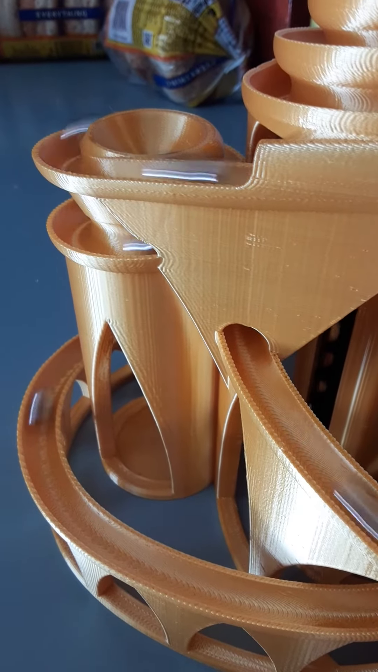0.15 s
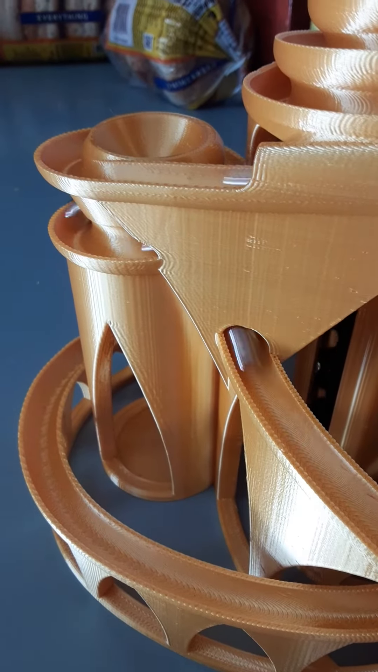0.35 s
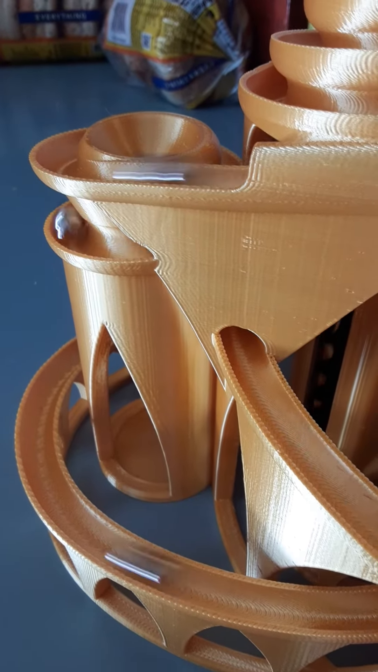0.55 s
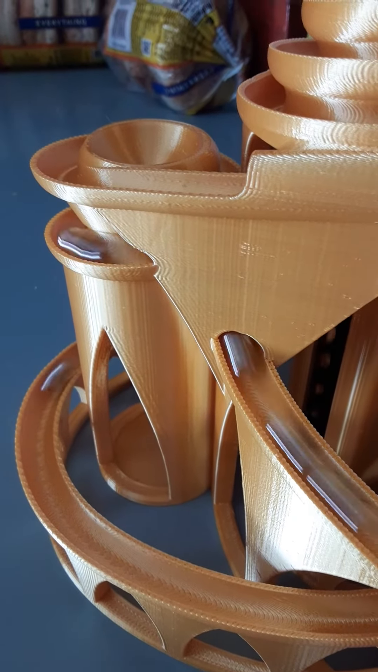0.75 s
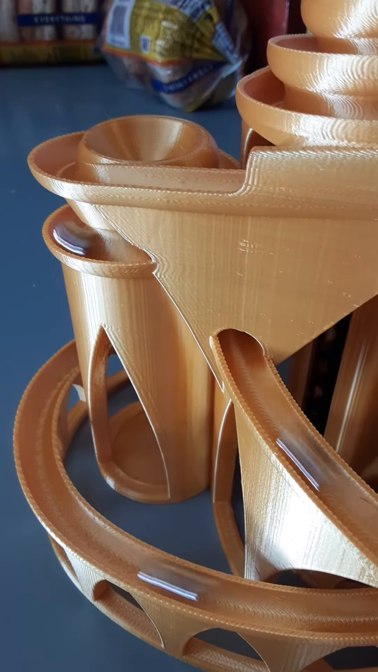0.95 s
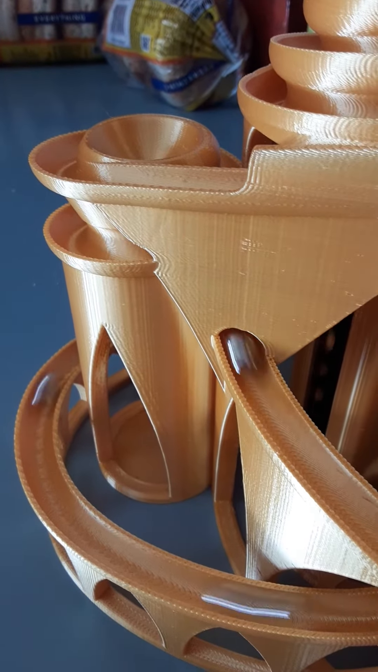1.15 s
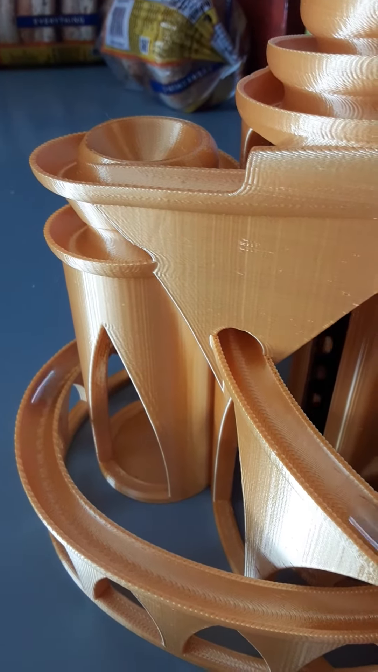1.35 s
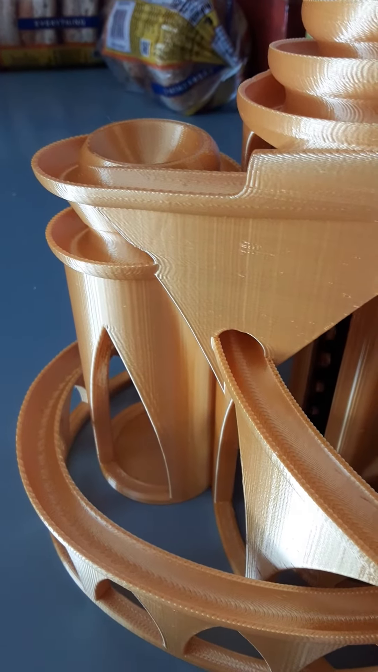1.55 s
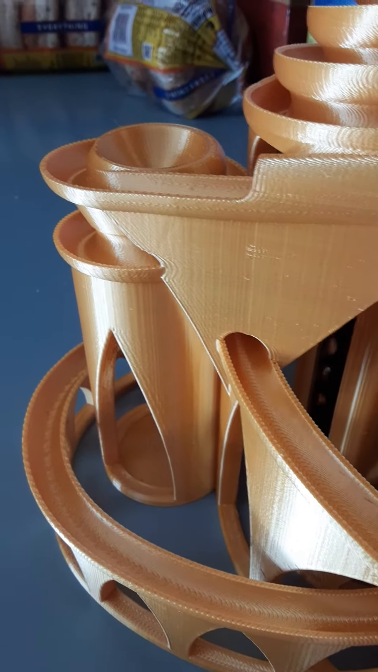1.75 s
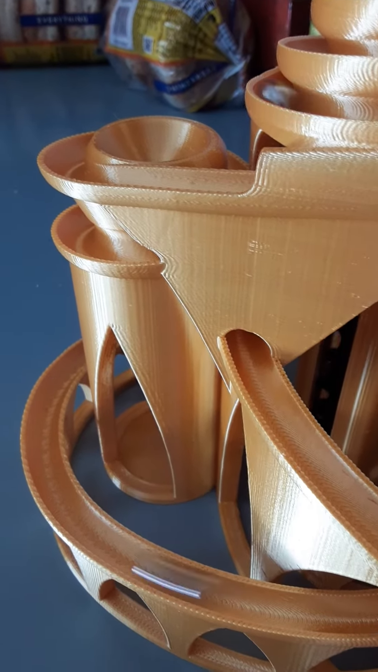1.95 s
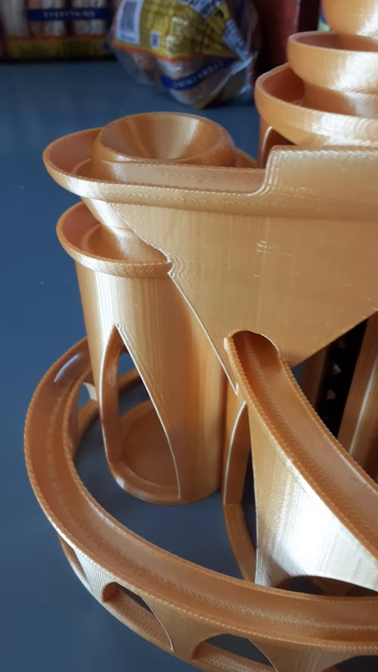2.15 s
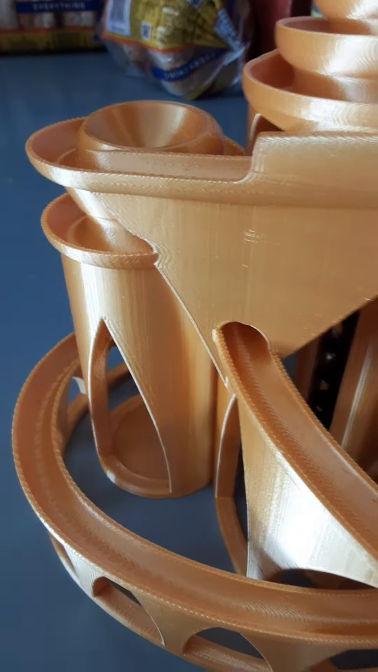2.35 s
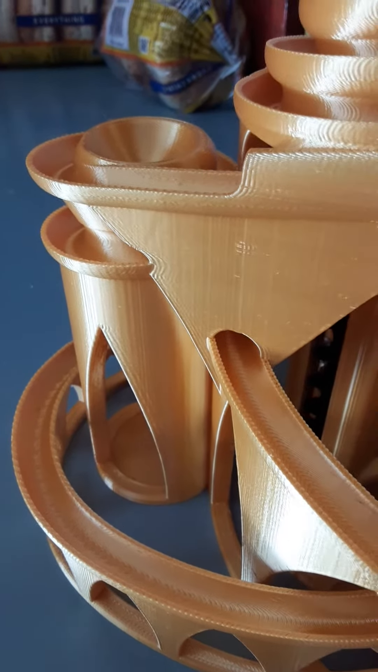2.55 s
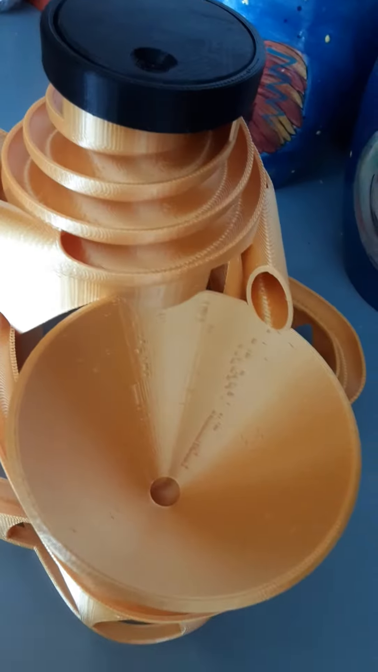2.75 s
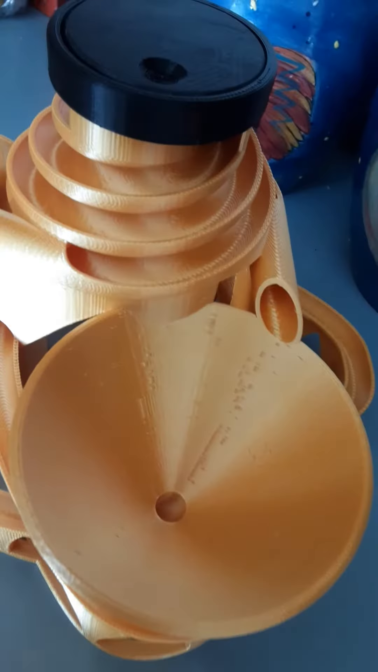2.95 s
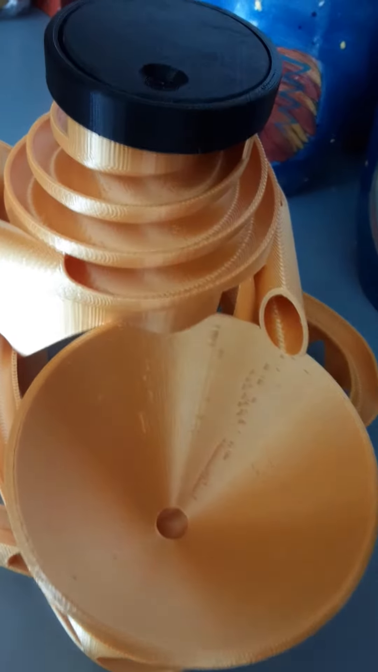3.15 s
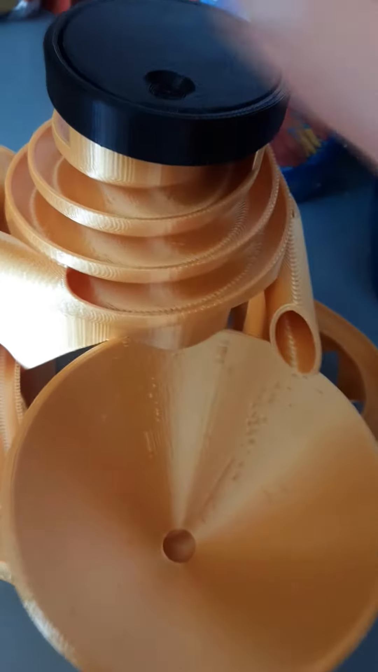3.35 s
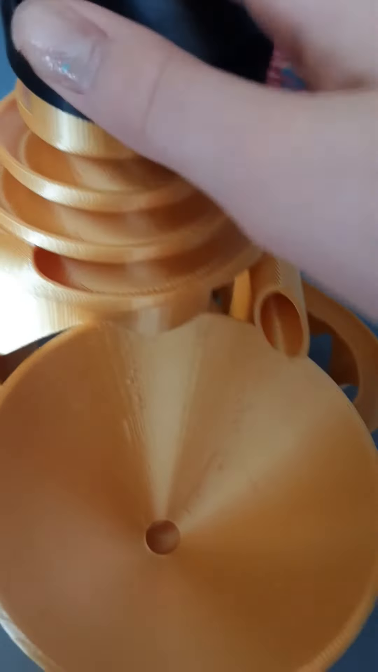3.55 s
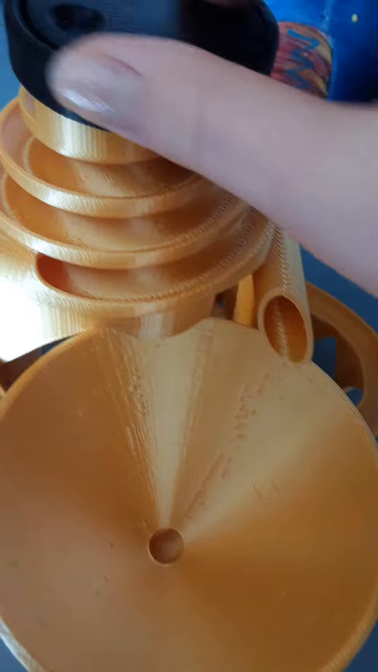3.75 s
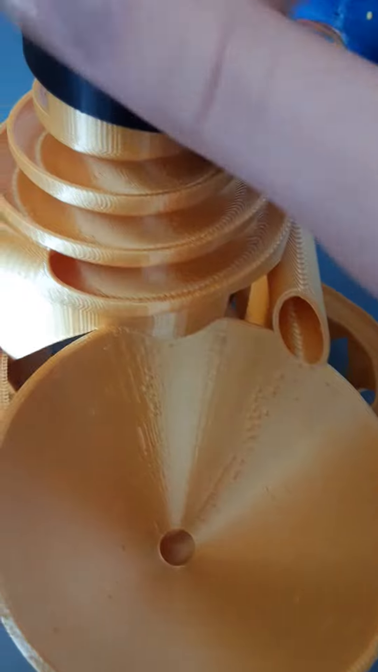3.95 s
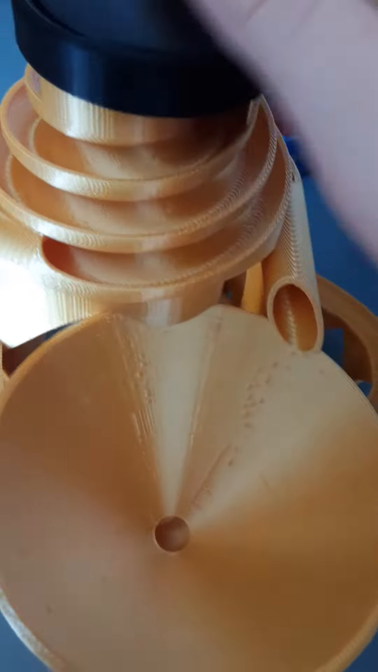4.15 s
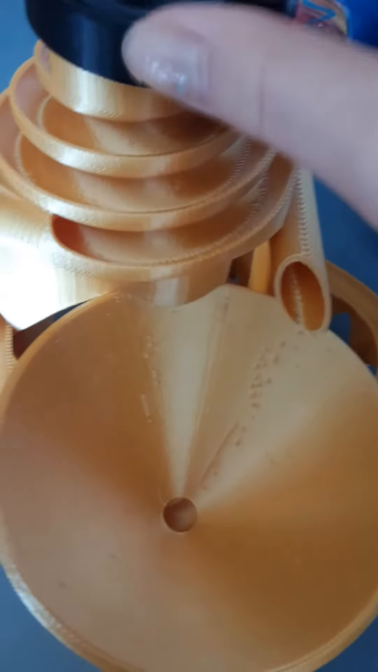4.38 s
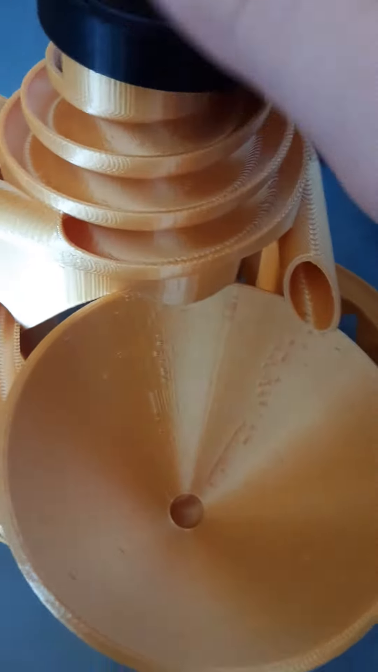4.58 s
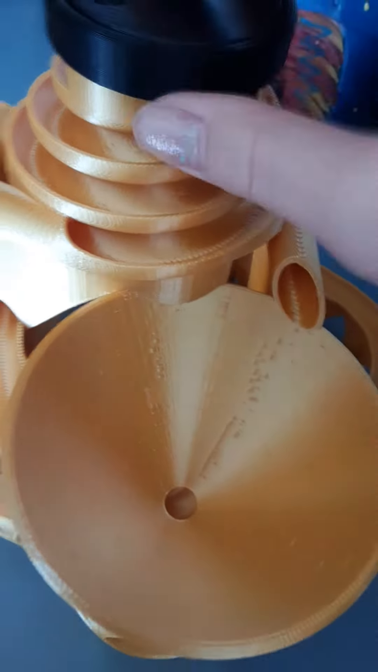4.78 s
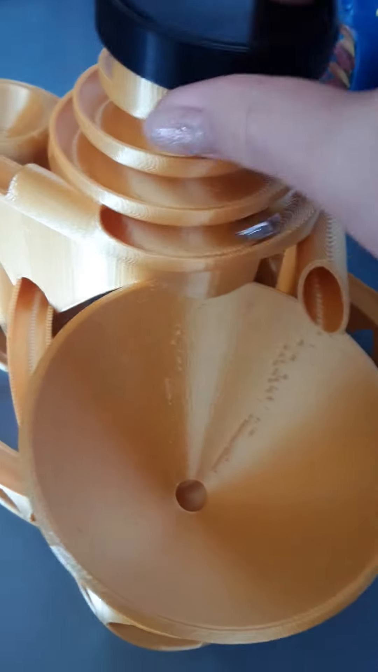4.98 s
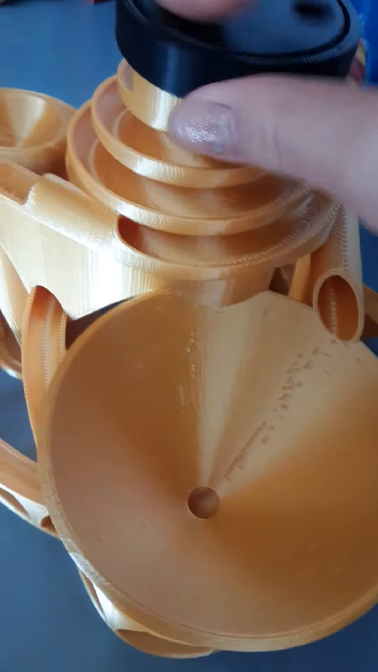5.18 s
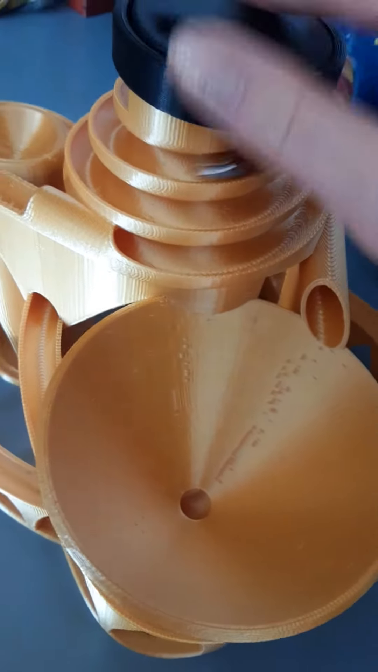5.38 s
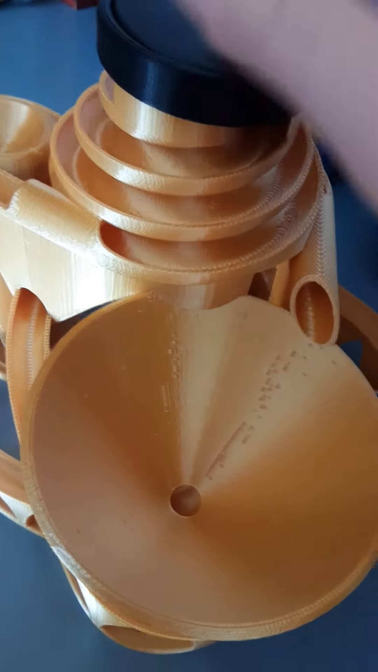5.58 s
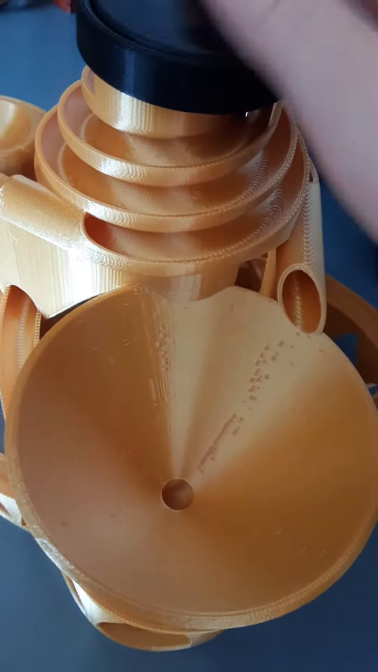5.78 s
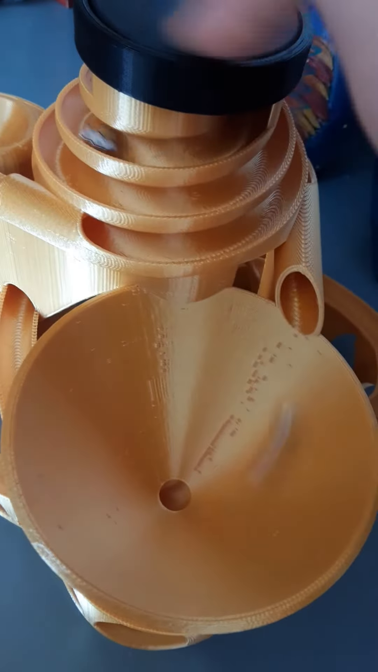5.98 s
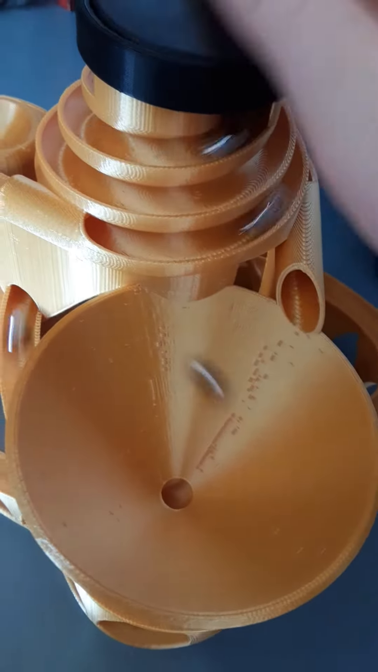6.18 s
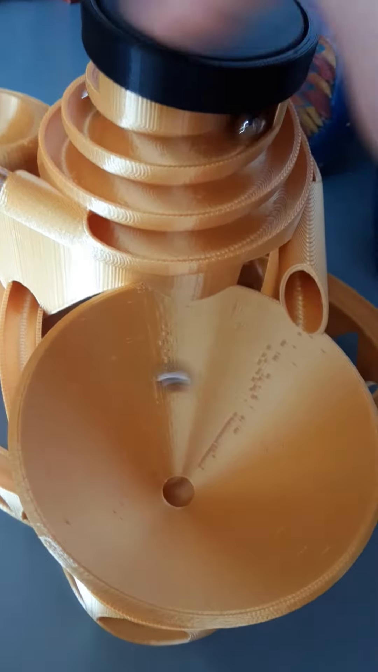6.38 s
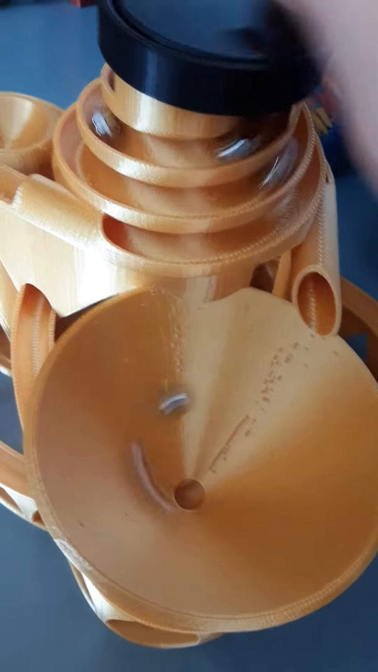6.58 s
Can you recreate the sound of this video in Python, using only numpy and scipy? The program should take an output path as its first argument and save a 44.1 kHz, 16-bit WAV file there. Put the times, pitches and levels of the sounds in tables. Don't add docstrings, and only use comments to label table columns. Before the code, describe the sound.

Dense clattering of metal balls in a plastic marble run stops abruptly; after a hush, three creaky jerks and knocks restart a thinner rolling rattle.

```python
import sys
import numpy as np
from scipy import signal
from scipy.fft import rfft, irfft
from scipy.io import wavfile
from scipy.ndimage import uniform_filter1d

SR = 44100
rng = np.random.default_rng(int(sys.argv[2]) if len(sys.argv) > 2 else 0)


def voltage_ratio(level):
    return 10 ** (np.asarray(level, float) / 20)


def master(y):
    cut = np.clip(np.atleast_2d(y).T, -1, 1)
    pcm = np.round(cut * 32767)
    wavfile.write(sys.argv[1], SR, pcm.astype(np.int16))


N = 291942

CHANGE_S = 2.734
REST_S = (4.58, 4.94)
TOP_HZ = 15900


# low edge in Hz, high edge in Hz.
EDGES_HZ = [
    (400, 4000),
    (4000, 8500),
    (8500, 15700),
    (45, 400),
]
WALLS_HZ = [
    [1350, 1896, 2070, 2550, 2980, 3350],
    [770, 1080, 1360, 1900, 2380, 3700],
    [1280, 1900, 2850],
    [990, 1330, 1606, 1910, 2400, 2524, 3150],
]


def rolling():
    force = ridges(spread_db=2.2, smear_s=0.0006, steady=0.7)
    rattle, treble, air, drone = [shell(force, *edge) for edge in EDGES_HZ]

    place = np.searchsorted([CHANGE_S, *REST_S], np.arange(N) / SR)
    walls = [ticks(hz, rate=700, spread_db=2.2, decay=420, tilt=0.3) for hz in WALLS_HZ]
    ribs = ticks(np.geomspace(4300, 7800, num=7), rate=600, spread_db=1.5, decay=490)
    rattle = 0.75 * rattle + voltage_ratio(-5.0) * np.choose(place, walls)
    treble = 0.75 * treble + voltage_ratio(-7.5) * ribs

    sharp, shiver_gain, flutter = clinks(), shiver(), walk(40)
    rattle = rattle * roll_gain("rattle") * voltage_ratio(0.7 * flutter)
    treble = treble * sharp * roll_gain("treble") * voltage_ratio(1.2 * flutter + walk(70))
    air = air * sharp * roll_gain("air") * voltage_ratio(1.5 * flutter + walk(60))
    drone = drone * roll_gain("drone") * voltage_ratio(2.5 * walk(12))
    return (rattle + treble + air) * shiver_gain + drone


def ridges(spread_db, smear_s, steady):
    bumps = voltage_ratio(spread_db * rng.exponential(size=N)) * (rng.random(N) < 1100 / SR)
    keep = np.exp(-1 / (smear_s * SR))
    swell = signal.lfilter([1], [1, -keep], bumps)
    return level(rng.standard_normal(N) * (swell + steady))


# frequency in Hz, density in dB per Hz.
SIDE_A = [(24, -58), (40, -23.5), (167, -3.5), (262, -13), (312, -4.5), (372, -12), (615, -6.5),
          (852, -8.5), (1340, -1), (2050, -4), (2260, -3), (7540, -16), (8550, -22), (12100, -15.5),
          (16000, -25.5)]
SIDE_B = [(24, -56), (40, -27), (101, -17), (159, -3.5), (209, -4), (262, -20), (312, -7), (529, -9.5),
          (990, -7.5), (1900, -3.5), (4460, -16.5), (7170, -18), (8550, -30.5), (11600, -28.5),
          (16000, -35.5)]
# centre in Hz, width in Hz, boost in dB.
RINGS_A = [(180, 110, 5.5), (312, 50, 7.5), (459, 84, 4.5), (610, 120, 4), (754, 90, 3), (1350, 100, 2),
           (2070, 41, 7), (3050, 250, 3.5), (7470, 500, 5), (12100, 900, -2)]
RINGS_B = [(177, 250, 1.1), (773, 16, 7.2), (1022, 53, 3), (1360, 70, 4.3), (1910, 34, 2.9),
           (2410, 71, 5.5), (2790, 300, 1.5), (6000, 700, 2.5), (7400, 400, 2), (11900, 1500, 4)]


def shell(force, lo_hz, hi_hz):
    parts = np.split(force[:N], [int(CHANGE_S * SR)])
    out = []
    for part, colour, rings in zip(parts, (SIDE_A, SIDE_B), (RINGS_A, RINGS_B)):
        answer = band(response(colour, rings), lo_hz, hi_hz)
        answer /= np.linalg.norm(answer)
        out.append(signal.oaconvolve(part, answer)[:len(part)])
    return np.concatenate(out)


def ticks(walls_hz, rate, spread_db, decay, tilt=0.0):
    size = voltage_ratio(spread_db * np.minimum(rng.exponential(size=N), 3.5))
    hits = size * rng.choice([-1, 1], N) * (rng.random(N) < rate / SR)
    wall = rng.integers(len(walls_hz), size=N)
    out = np.zeros(N)
    for k, hz in enumerate(walls_hz):
        awake = voltage_ratio(2.8 * walk(9))
        out += hz ** -tilt * ringing(hits * (wall == k) * awake, hz, decay)
    return level(band(out, 560, 9000))


def shiver():
    t = np.arange(N) / SR
    rate_hz = 88 * (1 + 0.1 * walk(60))
    phase = np.cumsum(rate_hz / SR) % 1
    return voltage_ratio(14 * (0.4 - phase) * (t > REST_S[0]) * (t < REST_S[1]))


def clinks():
    rate, decay_s = 55, 0.002
    hits = 0.35 * np.minimum(rng.exponential(size=N), 2) * (rng.random(N) < rate / SR)
    return 0.88 + signal.lfilter([1], [1, -np.exp(-1 / (decay_s * SR))], hits)


# time in seconds, traffic in dB, steel-on-steel clink in dB against it.
TRAFFIC = [
    [(0.0, -20.5, -12), (0.11, -25.5, -16), (0.22, -24.5, -9.5), (0.4, -23, -15), (0.55, -25.5, -14),
     (0.66, -23, -15.5), (0.85, -24.5, -16), (1.05, -23, -18), (1.43, -24.5, -20.5), (1.65, -24.5, -19.5),
     (1.76, -22, -14), (1.87, -25, -12), (2.09, -31, -19.5), (2.2, -26, -13.5), (2.31, -32, -11),
     (2.55, -32.5, -21), (2.74, -32.5, -20.5)],
    [(3.56, -70, -10), (3.572, -40, -16), (3.6, -57, -22), (3.71, -62, -14)],
    [(4.23, -35, -12), (4.262, -30.5, -8), (4.29, -40.5, -18), (4.33, -37, -24), (4.36, -50, -22)],
    [(4.5, -46, -7), (4.64, -46.5, -27), (4.85, -41.5, -25), (4.94, -39, -13), (4.96, -26, -23),
     (5.04, -29, -21), (5.09, -23.5, -24), (5.17, -28.5, -22.5), (5.39, -28.5, -21), (5.5, -30, -22.5),
     (5.63, -30, -22.5), (5.83, -26.5, -18.5), (5.94, -29, -23), (6.05, -26, -15.5), (6.27, -26, -20.5),
     (6.38, -24.5, -16), (6.49, -26, -19.5), (6.62, -20.5, -16)],
]
# start in seconds, drag in dB, catch in seconds, strain in dB,
# clink after the catch in dB.
STROKES = [
    (3.694, -40, 3.98, -26.5, -8),
    (4.09, -32, 4.2, -28, -11),
    (4.319, -34.5, 4.47, -30, -15.5),
]
# treble in dB, its change per traffic dB, its change per clink dB,
# table drone in dB, its change per traffic dB.
LAWS = [
    (-7.5, 0.54, 0.5, -18.5, 0.27),
    (-5.5, 0.15, 0.19, -15.5, -0.2),
]
# start in seconds, end in seconds, treble in dB, drone in dB.
SPELLS = [
    (2.138, 2.28, -8, 2),
    (2.3, 2.4, -1, 13.5),
    (4.04, 4.08, -5, 2),
    (4.124, 4.2, 0.5, -2),
    (4.584, 4.916, 4, 0.5),
    (4.802, 5.126, -1.5, 4),
    (5.9, 6.102, 0.5, 2.5),
    (6.43, 6.545, -0.5, -8),
]


def roll_gain(part):
    t = np.arange(N) / SR
    treble_spell, drone_spell = np.zeros((2, N))
    for start, end, treble_db, drone_db in SPELLS:
        inside = np.clip(np.minimum(t - start, end - t) / 0.03 + 0.5, 0, 1)
        treble_spell += treble_db * inside
        drone_spell += drone_db * inside

    power = np.zeros(N)
    for rows in TRAFFIC + [stroke(*row) for row in STROKES]:
        s, traffic_db, clink_db = np.transpose(rows)
        treble_db, per_db, per_clink, drone_db, drone_per_db = LAWS[int(s[0] > CHANGE_S)]
        span = slice(int(s[0] * SR), int(s[-1] * SR) + 1)
        db = np.interp(t[span], s, traffic_db)
        clink = np.interp(t[span], s, clink_db)
        busy, hard = db + 25, clink + 18
        if part == "treble":
            db = db + treble_db + per_db * busy + per_clink * hard + treble_spell[span]
        elif part == "air":
            db = db + clink
        elif part == "drone":
            db = db + drone_db + drone_per_db * busy + drone_spell[span]
        power[span] += voltage_ratio(db) ** 2
    return np.sqrt(power + 1e-12)


def stroke(start, drag_db, catch, strain_db, clink_db):
    bite_s, recoil_s, release_s = 0.03, 0.045, 0.058
    slack_db, recoil_db, release_db, dull_db = -12.5, -2, -14, -23.5
    recoil = catch + recoil_s
    free = recoil + release_s
    return [(start - bite_s, drag_db + 3 * slack_db, dull_db),
            (start, drag_db + slack_db, dull_db),
            (start + bite_s, drag_db, dull_db),
            ((start + catch) / 2 + bite_s, 0.75 * drag_db + 0.24 * strain_db, dull_db),
            (catch, strain_db, clink_db - 3.0),
            (recoil, strain_db + recoil_db, clink_db),
            (free, strain_db + release_db, dull_db),
            (free + release_s, strain_db + 3 * release_db, dull_db)]


# time in seconds, low rib in Hz, high rib in Hz, level in dB.
RIBS = [
    (1.649, 3290, 5980, 4),
    (2.303, 2030, 3210, 3),
    (2.326, 3200, 4700, 0),
    (3.992, 1350, 4660, -1),
    (4.212, 2340, 3860, 3),
    (4.474, 4220, 5400, 6),
    (6.317, 6450, 7140, -2),
]
# frequency in Hz, level in dB, decay per second.
TUBE = [
    (1280, -28.5, 200),
    (1900, -28, 160),
    (2850, -26, 125),
]


def knocks():
    size = 4096
    force, crack, ring = np.zeros((3, N + size))
    t = np.arange(size) / SR
    for s, body_db, ring_hz, crack_db, rise_ms, fall_ms in blows():
        rise, fall = max(0.59 * rise_ms, 0.15) / 1000, max(fall_ms, 0.8) / 1000
        chatter = rng.standard_normal((2, size)) * np.minimum(t / rise, 1)
        after = np.maximum(t - rise, 0)
        chatter *= 1 + 1.6 * np.exp(-(after + rise) / 0.00034)
        shake = voltage_ratio(body_db) * chatter[0] * np.exp(-after / (1.2 * fall))
        snap = voltage_ratio(crack_db) * chatter[1] * np.exp(-after / (0.88 * fall))

        low_hz, high_hz, rib_db = rng.uniform(3000, 4800), rng.uniform(5500, 7200), -3
        for at, *rib in RIBS:
            if abs(at - s) < 0.003:
                low_hz, high_hz, rib_db = rib
        span = slice(int(s * SR), int(s * SR) + size)
        force[span] += shake
        crack[span] += snap
        ring[span] += voltage_ratio(-21) * ringing(shake, ring_hz, 330)
        ring[span] += voltage_ratio(rib_db - 22) * ringing(snap, low_hz, 400)
        ring[span] += voltage_ratio(rib_db - 21) * ringing(snap, high_hz, 550)

    force, crack, ring = force[:N], crack[:N], ring[:N]
    now = np.arange(N) / SR
    taps = force * (now > REST_S[0]) * (now < REST_S[1])
    tube = sum(voltage_ratio(db) * ringing(taps, hz, decay) for hz, db, decay in TUBE)
    hard = 2.68 * signal.lfilter([1, -0.75], [1], force)
    air = roll_gain("air") / roll_gain("treble")
    body = voltage_ratio(-2.0) * shell(hard, 320, 5300) + band(ring + tube, 800, 7400)
    bright = voltage_ratio(-2.0) * shell(crack, 3600, 8500)
    return body + bright + voltage_ratio(3.0) * air * shell(crack, *EDGES_HZ[2])


# time in seconds, body in dB, loudest ring in Hz, crack in dB.
TICKS = [(.0376, -13.5, 3140, -19), (.128, -28, 1990, -16), (.1883, -17, 1790, -20),
         (.9386, -21, 1220, -18.5), (2.1179, -22, 2020, -29), (2.7067, -29, 1960, -28),
         (2.6133, -25, 1960, -38), (2.6937, -25.5, 2740, -41), (2.724, -29.5, 2020, -36),
         (4.2217, -19.5, 2335, -37.5), (5.482, -20, 1900, -20), (5.514, -27, 4530, -27),
         (2.4703, -34, 1970, -32), (5.5436, -39, 1350, -23), (5.5865, -40, 1650, -24),
         (6.0634, -34, 2050, -21), (6.2966, -15.5, 1900, -19), (6.3168, -29, 1400, -16),
         (6.4151, -19.5, 1940, -19), (6.5402, -16, 1350, -15.5)]
DROPS = [(.1152, -20, 2070, -19.5), (.1683, -13, 2090, -26), (.5724, -21, 2050, -22),
         (.6493, -16, 1990, -17), (1.0476, -32, 2030, -29), (1.242, -28, 1370, -31),
         (1.484, -17, 3460, -22.5), (1.6482, -13, 4480, -10.5), (1.7063, -16.5, 1200, -26),
         (1.9042, -18.5, 1930, -18), (1.982, -29, 2730, -33), (2.0012, -40, 1360, -27.5),
         (2.091, -28, 2000, -28), (2.2519, -25, 2160, -32), (2.303, -11.5, 1530, -21),
         (6.036, -15.5, 2030, -18), (6.3916, -18.5, 2790, -30), (6.5066, -22.5, 1650, -26),
         (6.5295, -25, 2380, -28), (6.5685, -15, 1940, -14.5)]
TAPS = [(4.6441, -46, 1910, -45), (4.6187, -43, 1280, -54), (4.683, -35, 2505, -34),
        (4.6955, -33, 2840, -29), (4.707, -46, 6130, -28), (4.7173, -40, 2540, -41),
        (4.7462, -45, 1960, -40), (4.7723, -48, 1940, -46), (4.7902, -42, 1900, -47),
        (4.8043, -44, 1860, -25), (4.8133, -30.5, 1910, -29), (4.8286, -42, 4300, -27),
        (4.841, -32, 1300, -46), (4.8477, -32, 5070, -29), (4.8579, -27, 2680, -37),
        (4.872, -37, 2760, -34.5), (4.882, -38, 2830, -42)]
# the same four, then fall in ms.
CLATTERS = [(0.862, -17, 2160, -28, 12), (1.0372, -15, 2130, -14, 10), (1.1295, -23, 3030, -26, 6.5),
            (1.1598, -21, 3500, -23.5, 8.6), (1.326, -14, 1395, -21.5, 21), (1.3579, -15, 2070, -19.5, 8.9),
            (1.465, -16, 2980, -20.5, 8), (1.493, -17, 1320, -24.5, 8.8), (1.6711, -26, 3300, -17, 7),
            (1.7741, -18.5, 2000, -32, 13), (2.1493, -22.5, 1940, -25, 24), (2.2306, -23, 2070, -35, 17),
            (2.3259, -11.5, 2230, -20.5, 12), (2.374, -18, 2070, -32, 19),
            (3.9641, -18.5, 1167, -23.5, 13.7), (4.0018, -17, 1810, -34, 8.4),
            (4.4054, -26.5, 1360, -37, 11), (4.185, -30, 1900, -35, 14), (5.4333, -28, 1250, -28, 85),
            (5.613, -29.5, 1630, -26.5, 11), (5.773, -27, 1350, -29, 18), (6.364, -22, 1950, -24, 9.3)]
# the same four, then rise in ms.
SKIDS = [(.0082, -21.5, 2980, -24, 5), (0.2294, -17, 1340, -21, 5.7), (0.241, -18, 1820, -26, 4.6),
         (1.7428, -18, 3480, -13, 4.5), (1.8403, -16, 3410, -15.5, 9.3), (2.513, -31.5, 1966, -38.5, 5.3),
         (3.562, -40, 1360, -58, 7.9), (3.7689, -36, 2030, -41, 6), (3.9919, -15, 3800, -15, 5.4),
         (4.2114, -12, 1475, -13.5, 3.36), (4.474, -11, 1350, -16.5, 3), (4.953, -28.5, 1910, -41, 5.2),
         (4.9819, -23.5, 1660, -27, 11), (5.0654, -21, 1510, -24.5, 11.3)]


def blows():
    rows = [(*row, 1, 2.6) for row in TICKS]
    rows += [(*row, 0.94, 5.8) for row in DROPS]
    rows += [(*row, 0.6, 2.2) for row in TAPS]
    rows += [(*row, 1.9, fall_ms) for *row, fall_ms in CLATTERS]
    return rows + [(*row, rise_ms, 1.59 * rise_ms) for *row, rise_ms in SKIDS]


# time in seconds, level in dB, ring in Hz.
RAPS = [(0.093, -19.0, 2110.0), (0.1281, -18.0, 2650.0), (0.22, -15, 3180), (0.2934, -21, 1340.0),
        (0.3493, -17.0, 1460.0), (0.381, -20, 1930.0), (0.4422, -16.5, 1330), (0.458, -15, 2800),
        (0.7168, -18, 3160), (0.7819, -16, 1320.0), (0.853, -19, 2050.0), (0.9075, -19.0, 1400),
        (0.9988, -19, 1390.0), (1.5348, -20.0, 1970.0), (1.574, -22.0, 1510.0), (1.65, -8.0, 3360),
        (2.1196, -18.0, 2790.0), (2.1434, -20, 1780.0), (2.2023, -18.0, 2010.0), (2.412, -21.0, 2000.0),
        (2.492, -24.5, 1330), (2.6246, -27, 1360.0), (2.7078, -24.0, 1260.0), (3.773, -31.0, 1110.0),
        (4.251, -19.5, 1510.0), (4.2712, -34, 1870.0), (4.3295, -33.0, 2340.0), (4.5138, -24.0, 1550.0),
        (4.79, -36, 1190), (4.909, -33, 1720.0), (5.2614, -24, 2270.0), (5.4206, -25, 1320.0),
        (5.4786, -22, 1880.0), (5.68, -27, 1940.0), (5.7616, -24, 1480.0), (5.962, -22, 1890.0),
        (5.9826, -24, 1280.0), (6.3791, -21, 1930), (6.442, -22.0, 2200.0), (6.5574, -15, 2430.0),
        (6.5686, -12, 1930.0), (6.5888, -17, 3760.0)]
PINGS = [(0.0104, -12, 4350), (0.0884, -22, 4430.0), (0.2187, -20, 7180.0), (0.3736, -23.0, 7620.0),
         (0.5385, -20, 4950.0), (0.6968, -20.0, 4010.0), (0.7282, -25.0, 4330.0), (1.0222, -23, 6830.0),
         (1.0389, -12.5, 4660), (1.1288, -24.0, 4470.0), (1.1624, -24, 7700.0), (1.359, -15.0, 4550),
         (1.493, -22, 5440.0), (1.536, -31, 4000), (1.8514, -13, 4940), (1.8772, -20, 4640.0),
         (2.1436, -29.0, 4260), (2.328, -15.5, 4800), (2.5662, -35, 4010.0), (2.6842, -38.0, 4010.0),
         (4.2152, -14.5, 4040), (4.6684, -42.0, 5850.0), (4.7534, -37.0, 5880.0), (4.7814, -37.0, 5900),
         (4.9613, -31.0, 5710.0), (5.0273, -30, 7310.0), (5.0636, -25, 4710.0), (5.2917, -33.0, 5880.0),
         (5.5698, -27.0, 5980.0), (5.5847, -23, 4800.0), (5.6447, -26, 4910.0), (5.6814, -27, 4790.0),
         (5.7024, -27, 4130.0), (5.9139, -26, 4940.0), (6.0506, -20, 5900), (6.1032, -24, 6720.0),
         (6.1154, -24, 6080.0), (6.1339, -24, 5940.0), (6.1409, -23, 5240.0), (6.16, -28, 5170.0),
         (6.309, -19, 6960.0), (6.3591, -23.0, 5770.0), (6.5281, -20.5, 6710.0), (6.6022, -20, 6500)]
CHINKS = [(0.0511, -28.0, 12630.0), (0.1093, -32.0, 10910.0), (0.1478, -28.0, 12660.0),
          (0.2487, -22.0, 12500.0), (0.5107, -32.0, 11770.0), (0.5967, -29.0, 9100.0),
          (0.6127, -23, 11050.0), (0.6503, -17, 12930.0), (0.6624, -29.0, 10120.0),
          (0.7106, -28.0, 10360.0), (0.7404, -29, 9990.0), (0.8694, -30, 12040.0), (0.9559, -31.0, 10580.0),
          (1.0219, -31.0, 12400.0), (1.5352, -37.0, 11220.0), (1.5723, -35.0, 9930.0),
          (1.6737, -19.0, 11660.0), (2.1852, -30.0, 14810.0), (2.2459, -25.0, 11700),
          (3.7321, -44, 12070.0), (3.8609, -43, 11660.0), (3.8741, -45, 11660.0), (4.2621, -34.0, 10090.0),
          (5.0732, -31.0, 12110.0), (5.5028, -35, 11270.0), (5.5783, -44, 9220.0), (5.6799, -41.0, 11790.0),
          (5.6881, -40.0, 11440.0), (5.7108, -41.0, 11800.0), (5.8729, -40.0, 8990.0),
          (5.9241, -39.0, 9830.0), (5.9904, -32.0, 10660.0), (6.0308, -31.0, 9030.0),
          (6.0963, -31.0, 8750.0), (6.1031, -32.0, 8720.0), (6.1209, -32, 10820.0),
          (6.1295, -36.0, 11990.0), (6.1405, -34.0, 8810.0), (6.3089, -29.0, 10020.0), (6.332, -29, 9100.0),
          (6.379, -33.0, 8810.0), (6.3929, -26, 8790.0), (6.5483, -31, 13370.0), (6.5537, -31, 12470.0)]
RINGS_3K = [(4.7285, -42, 2800), (4.859, -36, 2850), (4.874, -35, 2830), (4.882, -36, 2860),
            (4.897, -38, 2830), (4.907, -38, 2830), (4.918, -37, 2850), (4.931, -39, 2830),
            (.0125, -15, 3020), (.02, -18, 3000), (0.027, -16, 3000), (.045, -18.5, 3020),
            (0.0528, -19, 3050), (.06, -19, 2900)]
# decay per second, gain in dB, scuff in dB.
CONTACT_KINDS = [
    (330, 2.5, -8),
    (450, 4.5, -5),
    (550, 4, -2),
    (199.8, 2.5, -9),
]


def contacts():
    size = 2048
    out, t = np.zeros(N + size), np.arange(size) / SR
    for rows, (decay, gain_db, scuff_db) in zip((RAPS, PINGS, CHINKS, RINGS_3K), CONTACT_KINDS):
        for s, db, hz in rows:
            push = rng.standard_normal(size) * np.exp(-t / 0.00027) + 2 * (t == 0)
            neighbour_hz = hz * rng.uniform(0.75, 1.4)
            ring = ringing(push, hz, decay) + 0.6 * ringing(push, neighbour_hz, 1.5 * decay)
            scuff = rng.standard_normal(size) * np.exp(-1.2 * decay * t)
            scuff = band(scuff, 0.66 * hz, min(1.6 * hz, TOP_HZ))
            hit = ring / np.abs(ring).max() + voltage_ratio(scuff_db) * scuff / np.abs(scuff).max()
            out[int(s * SR):int(s * SR) + size] += voltage_ratio(db + gain_db) * hit
    return band(out[:N], 600, TOP_HZ)


# frequency in Hz, width in Hz, level in dB against the traffic.
PANELS = [(467, 25, -24.5), (600, 50, -21.5), (640, 40, -23.5), (752, 45, -22.5)]
# start in seconds, end in seconds, first pitch in Hz, last pitch in Hz,
# level in dB against the traffic.
SONGS = [
    (3.8, 3.98, 780, 800, -10),
    (4.33, 4.56, 1050, 1200, -6),
    (4.8, 4.95, 2880, 2820, -6),
    (5.7, 6.02, 1300, 1450, -6),
    (6.15, 6.5, 1930, 1960, -7),
]


def panels():
    hum = np.zeros(N)
    for hz, width_hz, db in PANELS:
        panel = ringing(rng.standard_normal(N), hz, np.pi * width_hz)
        hum += level(panel, db) * voltage_ratio(4 * walk(7))
    hum = band(hum, 380, 1000) * (np.arange(N) / SR < CHANGE_S)

    grit = ridges(spread_db=3, smear_s=0.001, steady=0.5)
    for start, end, from_hz, to_hz, db in SONGS:
        a, b = int(start * SR), int(end * SR)
        turn = np.exp(2j * np.pi * np.cumsum(np.linspace(from_hz, to_hz, b - a)) / SR)
        sway = signal.lfilter([1], [1, -np.exp(-220 / SR)], grit[a:b] / turn)
        song = band((sway * turn).imag, 500, 5000)
        hum[a:b] += level(song, db) * np.sqrt(np.hanning(b - a))
    return hum * roll_gain("rattle")


# frequency in Hz, density in dB per Hz.
ROOM = [(18, -36), (30, -4.5), (106, 0.5), (252, -5), (355, -11), (616, -15.5), (3400, -29.5),
        (5900, -29.5), (7470, -17), (9460, -32.5), (10500, -17.5), (12300, -26), (16000, -15.5)]
# time in seconds, low rumble in dB.
GRIP = [
    (2.95, -83),
    (3.28, -83.5),
    (3.32, -69.5),
    (3.41, -66),
    (3.45, -83.5),
]


def room():
    hiss = level(signal.oaconvolve(rng.standard_normal(N), response(ROOM))[:N], -73)
    rumble = level(band(rng.standard_normal(N) * voltage_ratio(3 * walk(35)), 55, 140))
    s, db = np.transpose(GRIP)
    grip_db = np.interp(np.arange(N) / SR, s, db, left=-120, right=-120)
    return hiss + rumble * voltage_ratio(grip_db - 2.5)


def response(points, rings=(), size=8192):
    hz = np.arange(size // 2 + 1) * SR / size + 1
    point_hz, point_db = np.transpose(points)
    db = np.interp(np.log(hz), np.log(point_hz), point_db)
    for centre_hz, width_hz, boost_db in rings:
        db = db + boost_db / (1 + (2 * (hz - centre_hz) / width_hz) ** 2)
    cepstrum = irfft(np.log(voltage_ratio(np.maximum(db, -90))))
    cepstrum[1:size // 2] *= 2
    cepstrum[size // 2 + 1:] = 0
    return irfft(np.exp(rfft(cepstrum)))


def ringing(x, hz, decay):
    return signal.lfilter([1], [1, -np.exp((2j * np.pi * hz - decay) / SR)], x).imag


def walk(rate):
    hold = int(SR / rate)
    steps = np.repeat(rng.standard_normal(N // hold + 1), hold)[:N]
    return 1.1 * uniform_filter1d(uniform_filter1d(steps, hold), hold)


def band(x, lo_hz, hi_hz):
    return signal.sosfilt(signal.butter(3, [lo_hz, hi_hz], "band", fs=SR, output="sos"), x)


def level(x, db=0):
    return x * voltage_ratio(db) / np.sqrt(np.mean(x ** 2))


def scene():
    tower = rolling() + knocks() + contacts() + panels()
    t = np.arange(SR // 4) / SR
    tail = band(rng.standard_normal(len(t)), 300, 5000) * np.exp(-t / 0.026) * (t > 0.003)
    now = np.arange(N) / SR
    first = np.clip((CHANGE_S - now) / 0.0019, 0, 1)
    second = now > CHANGE_S + 0.5
    side_a, side_b = [part + signal.oaconvolve(part, voltage_ratio(-40) * tail)[:N]
                      for part in (tower * first, tower * second)]
    return (side_a * first + side_b + room())[None]


def top_cut(x):
    return signal.sosfilt(signal.butter(12, 16640, fs=SR, output="sos"), x)


def record(dry):
    rounded = np.tanh(0.62 * dry) / 0.58
    low_pass = signal.ellip(8, 0.2, 70, TOP_HZ, fs=SR, output="sos")
    mix = signal.sosfilt(low_pass, rounded)
    return top_cut(mix)


dry = scene()
out = record(dry)
master(out)
```